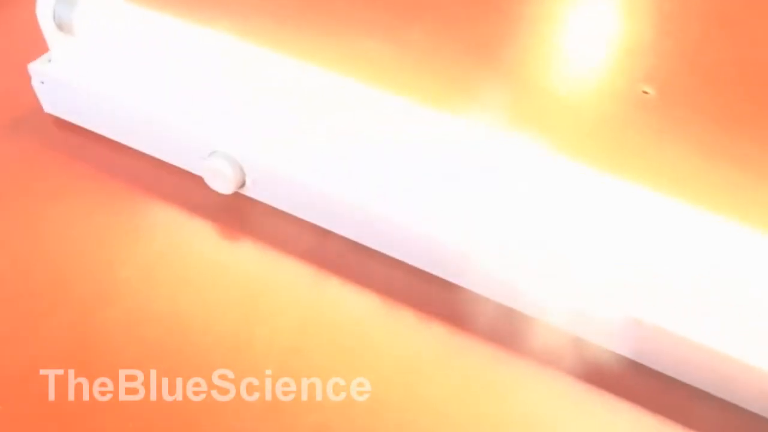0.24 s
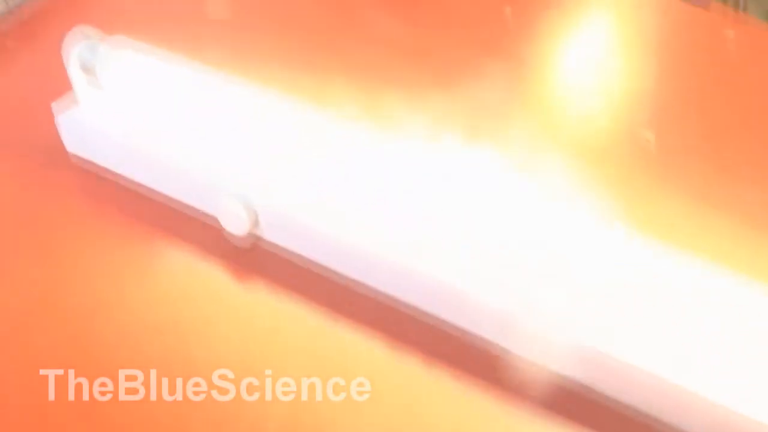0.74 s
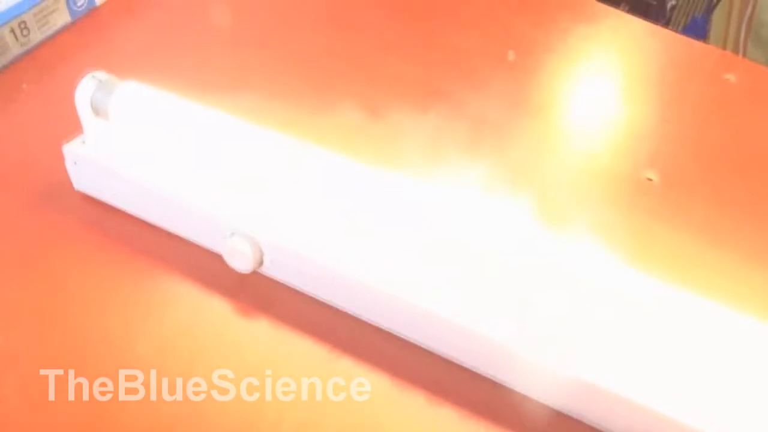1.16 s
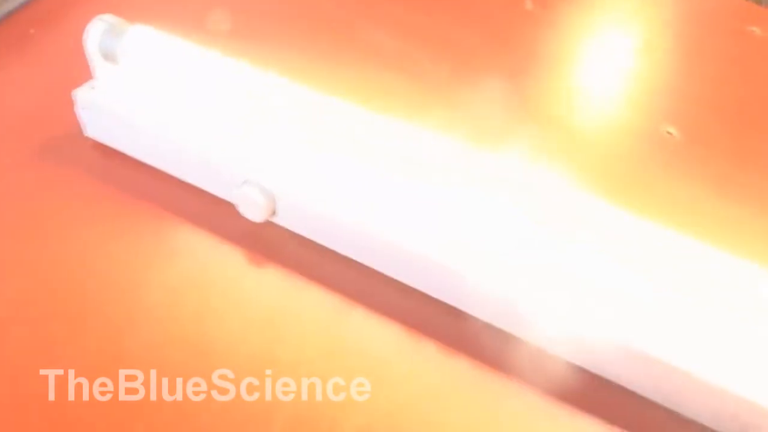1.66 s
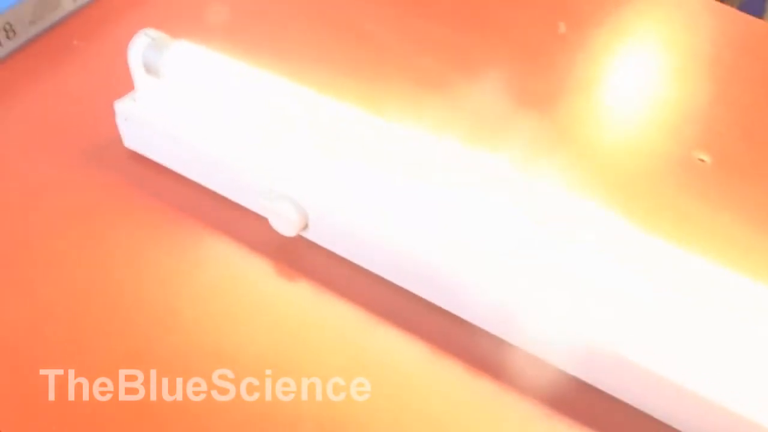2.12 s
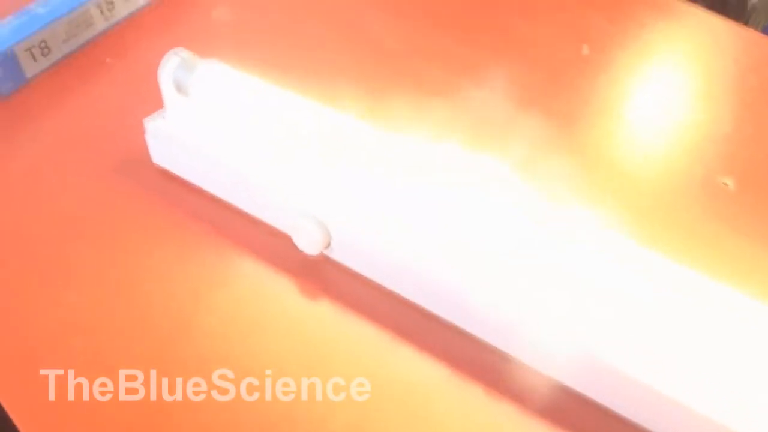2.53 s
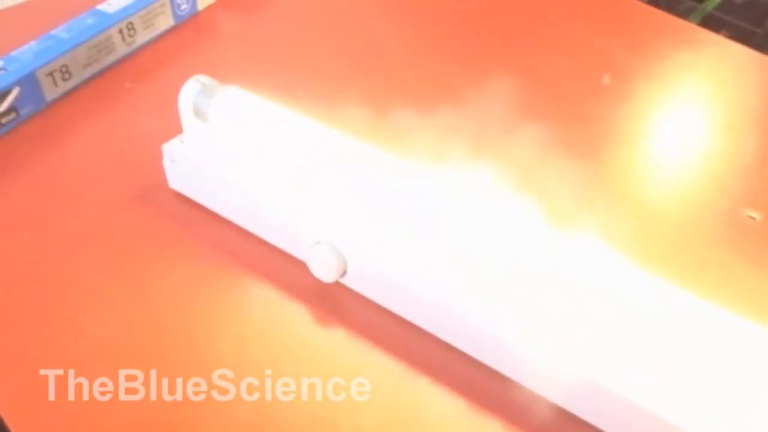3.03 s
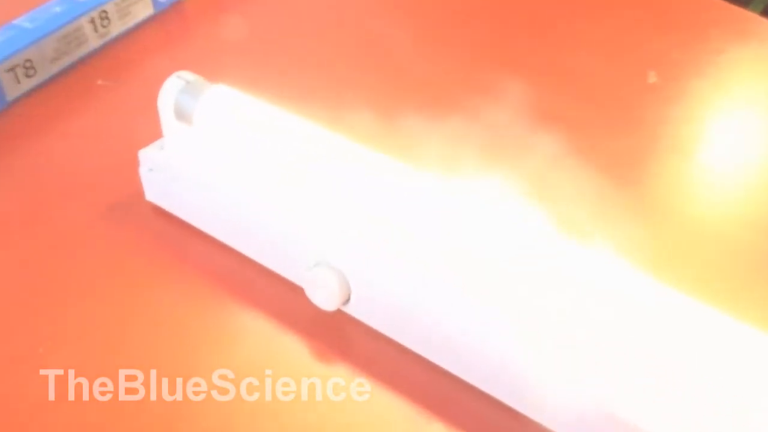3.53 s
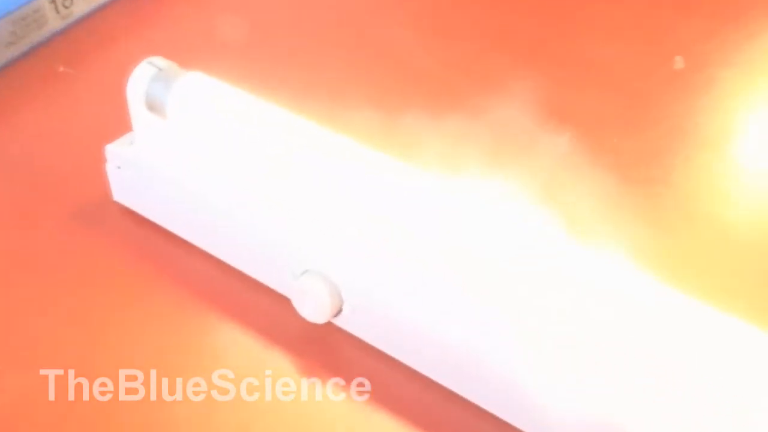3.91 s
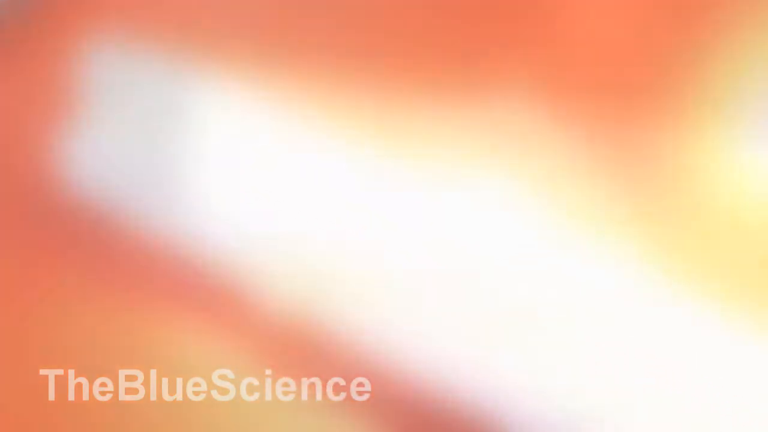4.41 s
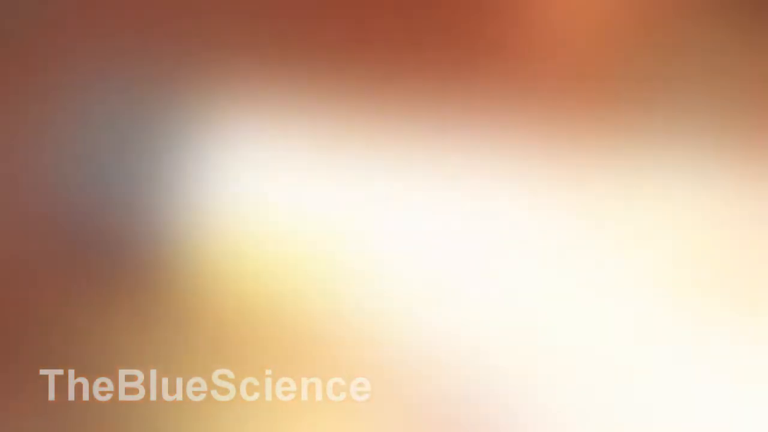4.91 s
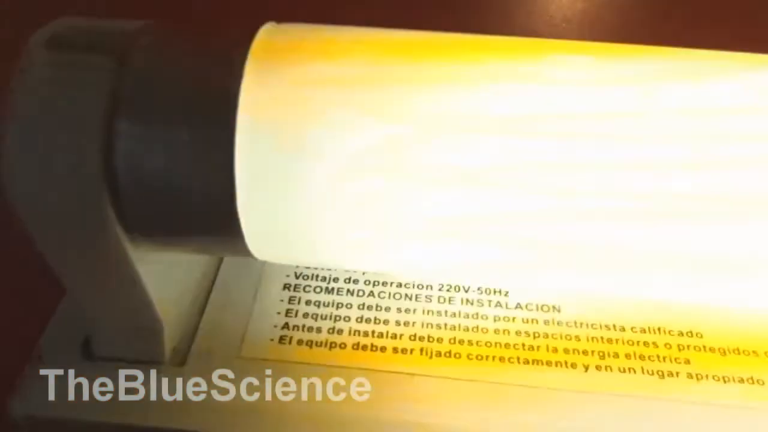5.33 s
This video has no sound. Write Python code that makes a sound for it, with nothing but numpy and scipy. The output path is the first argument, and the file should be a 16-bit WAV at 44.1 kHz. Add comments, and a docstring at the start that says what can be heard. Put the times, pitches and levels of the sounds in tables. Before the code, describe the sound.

Steady electrical hum of a lit fluorescent tube indoors, broken by soft bumps and clicks of a hand on the camera.

```python
"""At a table, a lit fluorescent fixture hums: its ballast core vibrates on multiples of the mains frequency and
drives the steel tray into a buzz. A hand-held camera backs away, so the pattern of the buzz changes at its two
microphone ports. The modes of its shell sound in thuds and ticks, and a rustle runs over it. Behind lie room
noise, the rumble of the hand and a faint whirr, sizzle and squeaks; everything fades at the end."""
import sys
import numpy as np
from scipy import signal
from scipy.fft import rfft, irfft, next_fast_len
from scipy.io import wavfile
from scipy.ndimage import uniform_filter1d

SR = 44100
rng = np.random.default_rng(int(sys.argv[2]) if len(sys.argv) > 2 else 0)


def to_wav(s):
    """Save 16-bit WAV."""
    ch = np.atleast_2d(s).T  # columns
    pcm = np.round(np.clip(ch, -1, 1) * 32767)  # PCM
    wavfile.write(sys.argv[1], SR, pcm.astype(np.int16))


N = 245343
TIME_S = np.arange(N) / SR
MAINS_HZ = 49.985
HARMONIC_HZ = np.arange(240) * MAINS_HZ
LEFT_RIGHT = np.array([[1], [-1]])  # opposite signs at the two ports

# Nearness of the camera, from 0 (far) to 1 (close): time_s, closeness
CLOSENESS = [(0, 0.99), (1.2, 0.9), (2.0, 0.79), (2.6, 0.58), (2.7, 0.2), (3.45, 0.09), (4.3, 0.15),
             (4.6, 0.05)]
# Lines of the core, and of the tray from near and far, set on the nearest harmonic: pitch_hz, level_db
CORE_LINES = [(199.2, -55), (301.5, -56), (349.9, -60.5), (398.4, -57), (452.2, -58), (500.6, -61),
              (549.1, -70.5), (597.5, -53.5), (651.4, -61.5), (699.8, -59), (748.3, -61.5), (802.1, -59.5),
              (850.6, -67), (899.0, -69), (947.5, -68.5), (1001, -63.5), (1050, -71), (1100, -72)]
TRAY_LINES_NEAR = [(1448, -69), (1650, -82), (1701, -75), (1800, -78), (1900, -70), (2100, -75),
                   (2148, -73), (2250, -77), (2299, -69), (2347, -64), (2400, -78), (2450, -76),
                   (2498, -76), (2552, -75), (2697, -76), (2848, -77), (2950, -75), (3747, -81),
                   (3898, -76), (4097, -80), (5647, -83), (5997, -83), (6250, -83), (6648, -83),
                   (7095, -81), (7300, -83), (7547, -78), (7650, -83), (7747, -74), (7849, -80),
                   (8145, -82), (8349, -84), (8446, -85), (8748, -82), (8899, -85), (9948, -87)]
TRAY_LINES_FAR = [(1448, -68), (1900, -75), (2099, -75), (2148, -75), (2347, -72), (2848, -75), (2950, -80),
                  (3047, -80), (3101, -79), (3149, -77), (3596, -84), (4097, -81), (4151, -80), (5050, -86),
                  (5399, -86), (6449, -82), (6597, -83), (6648, -79), (6848, -82), (7547, -85), (7747, -81),
                  (8495, -80), (8748, -83), (8947, -83), (11396, -91)]
# Spectral envelope of the tray's weak harmonics: frequency_hz, level_db
TRAY_WEAK_LINES = [(1120, -80), (1600, -86), (2500, -82.5), (4000, -89.5), (5500, -92.5), (8000, -93.5),
                   (10000, -94.5), (12000, -100)]
# Typical phase between the ports, for the fixture and for the shell: frequency_hz, phase_rad
FIXTURE_PORT_PHASE = [(200, .05), (500, 0.44), (1000, .4), (2500, 0.97), (4000, .3), (8000, 0.84),
                      (12000, .4)]
SHELL_PORT_PHASE = [(100, .1), (300, 0.27), (650, 1.05), (850, 2.87), (1300, 0.59), (2200, 1.35),
                    (4000, 0.55), (8000, 0.85), (12000, .3)]

# Soft impacts on the shell: start_s, peak_db, brightness_db_per_octave, relative_thump_db
THUDS = [(0.427, -33, -1, -16), (0.528, -35, 6, -18), (0.725, -23, 6, -11), (0.751, -32.5, -2, -1),
         (0.791, -30.5, -2, -9), (0.835, -26.5, 0, -12), (0.876, -30.5, 3, -7.5), (0.914, -26, 2, -8),
         (0.954, -23.5, 2, -23.5), (0.972, -33, -5, 0.5), (1.499, -34, -7, -7.5), (1.657, -34, -6, -3),
         (1.858, -27.5, -6, -4.5), (1.893, -35.5, -12, 0), (1.913, -42.5, -8, -1), (2.128, -31.5, 3, -5),
         (2.298, -31.5, 7, -1), (2.437, -26, 7, -26.5), (2.472, -27.5, 13, -16), (2.579, -35.5, -7, -7.5),
         (2.659, -29.5, 4, -8), (2.965, -24, 8.5, -7.5), (3.765, -35.5, 5, -18),
         (4.122, -35.5, -5.5, -16.5), (4.488, -31, -6, -13.5), (4.562, -33.5, -16, -8.5),
         (4.576, -36, -4, -5)]
# Hard impacts: start_s, crack_peak_db, centre_hz, left_minus_right_db, relative_ring_db,
# relative_treble_db
TICKS = [(0.7261, -45.5, 2700, 0, 6, 6), (0.9572, -40, 3770, -1, -9, -19), (1.1422, -41, 3900, 0, -3, -18),
         (1.7137, -47, 4300, 0.0, -12, -1), (2.125, -45, 3300, -5.5, 3, 6),
         (2.4175, -31.5, 3230, -6, 1, -2), (2.441, -38, 2610, -4, -7, -10),
         (2.4719, -10, 3490, -4.5, -12, -18), (2.4996, -41, 2720, -6, -10, -19),
         (2.6458, -43, 2500, 1, 10.5, 12), (2.6752, -41.5, 2680, -2.0, 6.5, -4),
         (3.7638, -38.5, 2920, -1, 0, -2), (3.9673, -42.5, 3170, -3.5, 0, -12),
         (4.1229, -12, 2410, -5, -4.5, -12), (4.1312, -23.5, 1850, 4.5, 0.5, -5.5),
         (4.2747, -43, 3100, -3, -10, -9), (4.297, -36, 3040, -7, -10, -7),
         (4.3463, -31, 3280, -8, -8.5, -16), (4.361, -40.5, 3180, -1.5, 2, -11),
         (4.4746, -36, 2620, 1, 0.5, 3), (4.4961, -46, 2620, -6, -4, 0), (4.5269, -46, 4580, -1, -17, -29)]
# Modes of the shell, two sets for thuds and three for ticks: pitch_hz, relative_db, t60_s
THUMP_MODES = [(146.3, -15, 0.07), (208, -5, 0.041), (278.6, 0.5, 0.069), (330, -6, 0.042)]
THUD_MODES = [(385, -6, 0.091), (521.6, -0.5, 0.068), (660.3, 7.5, 0.049), (860, -4, 0.13),
              (1016, 0.5, 0.039), (1256, -6.5, 0.039), (1447, -9.5, 0.039)]
TICK_MODES = [(570, -8, 0.015), (884, -2, 0.055), (1328, -9, 0.01), (1754, -7, 0.051), (2156, -1, 0.043),
              (2460, -7, 0.038), (2850, 0.5, 0.031), (2900, 1, 0.018), (4540, -9, 0.022)]
TREBLE_MODES = [(4530, -7, 0.022), (5540, -4, 0.01), (6470, -1, 0.0073), (5730, -3, 0.0042),
                (8010, -4, 0.014), (9200, -9.5, 0.0054), (9700, -5.5, 0.0079), (11760, -12, .005),
                (13100, -11, 0.005), (14500, -15.5, 0.005)]
CRACK_MODES = [(2050, -1.5), (2600, -3.5), (3200, -2), (4200, -1)]  # pitch_hz, relative_db only
# Rustle sliding over the shell, and swells driving its cavity: start_s, hold_s, level_db
SLIDES = [(2.126, 0.047, -47.5), (2.21, 0.047, -49.5), (2.413, 0.008, -50), (2.455, 0.014, -47.5),
          (2.648, 0.029, -55.5), (4.124, 0.017, -46.5), (4.304, .01, -52.5), (4.341, 0.0265, -57.5),
          (4.493, 0.036, -54.5)]
CAVITY_DRONES = [(0.74, 0.16, -58.5), (1.876, 0.095, -50)]
# Spectrum of the rustle: frequency_hz, relative_density_db
RUSTLE_SPECTRUM = [(300, -19), (1200, 8), (2500, 1.5), (5000, -7), (9000, -9), (15000, -25.5)]
# Swells of rumble as the grip shifts: peak_s, level_db
GRIP_SHIFTS = [(1.2, -71), (1.9, -63), (2.15, -59.5), (2.62, -67), (5.1, -70)]

# Faint squeaks: start_s, length_s, start_hz, end_hz, level_db
SQUEAKS = [(2.75, 0.087, 895, 890, -56), (2.84, 0.057, 910, 894, -48.5), (3.94, .06, 863, 850, -51),
           (4.02, 0.075, 906, 906, -59)]
# Envelopes of the whirr and the sizzle: time_s, level_db
WHIRR_LEVEL = [(0, -65), (1.5, -74.5), (2.62, -73), (2.69, -56.5), (3.3, -60), (3.45, -61), (4.0, -66),
               (4.25, -80.5), (5.1, -64)]
SIZZLE_LEVEL = [(0, -77), (2.0, -76), (2.7, -71.5), (4.0, -67.5), (4.6, -71), (5.101, -67)]
# Bands of the sizzle: centre_hz, width_hz, relative_db
SIZZLE_BANDS = [(6650, 410, -9.5), (7440, 1100, -1), (8800, 900, -1.5), (9420, 770, -7.5)]
# Room noise near the fixture and far from it: frequency_hz, relative_density_db
ROOM_SPECTRUM_NEAR = [(12, -58.5), (25, -22), (70, -10), (150, -1), (300, 0.5), (600, -2), (1000, -7.5),
                      (1300, -12.5), (2000, -18), (2370, -16), (3500, -22), (5200, -27.5), (7800, -24.5),
                      (10500, -31), (15800, -33.5)]
ROOM_SPECTRUM_FAR = [(12, -56), (25, -17.5), (70, -14.5), (150, -2.5), (300, -1.5), (600, -5), (1000, -7),
                     (1280, -11), (1800, -13), (3000, -19), (3600, -25), (6000, -24.5), (9000, -45.5),
                     (10500, -28.5), (15800, -30)]
# Stereo width of the room noise: frequency_hz, side_minus_mid_db
ROOM_WIDTH = [(20, -21), (120, -17.5), (300, -13.5), (700, -5), (1500, -2.5), (3500, -4.5), (8000, -24.5),
              (12000, -12)]
# Narrow bands of hiss: centre_hz, width_hz, near_db, far_db
HISS_BANDS = [(11550, 160, -80, -89), (4290, 430, -76.5, -72.5), (13250, 500, -91.5, -78)]


def fixture(closeness):
    """Forced vibration: the core jolts in every mains cycle, and hum and buzz share that timing."""
    hz = HARMONIC_HZ
    jitter = np.minimum(0.6 + hz / 1500, np.pi) * rng.standard_normal(len(hz))  # looser in the treble
    sweep = np.pi * 1.2e-5 * hz ** 2  # higher harmonics come first within a cycle
    port_phase = over_hz(FIXTURE_PORT_PHASE, hz) * rng.standard_normal(len(hz))
    phase = jitter + sweep + port_phase / 2 * LEFT_RIGHT
    return ballast_hum(phase) + tray_buzz(phase, closeness)


def ballast_hum(phase, flutter_db=0.61):
    """Harmonics of a periodic force: each core line wavers alone, a little differently at each port."""
    out = 0
    for line in CORE_LINES:
        flutter = wander(25) + 0.46 * wander(25) * LEFT_RIGHT
        out = out + mains_wave(harmonic_power([line]), phase) * undb(flutter_db * flutter)
    return out


def tray_buzz(phase, closeness, spread_db=6.5):
    """Radiation from a driven plate: the tray's pattern of harmonics depends on the listening point."""
    out = 0
    for lines, share in ((TRAY_LINES_NEAR, closeness), (TRAY_LINES_FAR, 1 - closeness)):
        scatter_db = spread_db * rng.uniform(-1, 1, len(HARMONIC_HZ))
        weak_db = over_hz(TRAY_WEAK_LINES, HARMONIC_HZ) + scatter_db
        weak = undb(2 * weak_db) * (HARMONIC_HZ > TRAY_WEAK_LINES[0][0])
        strong = harmonic_power(lines)
        power = np.where(strong > 0, strong, weak)
        out = out + share * undb(0.27 * wander(7)) * mains_wave(power, phase)
    return out


def harmonic_power(lines):
    """A periodic signal has a line spectrum: each line's power falls on the nearest mains harmonic."""
    power = np.zeros(len(HARMONIC_HZ))
    for hz, db in lines:
        power[round(hz / MAINS_HZ)] = undb(2 * db)
    return power


def mains_wave(power, phase, max_lead_rad=0.46, size=2 ** 14):
    """Fourier synthesis: harmonics sum to one repeating cycle, which reaches the left port first."""
    lead = max_lead_rad * np.tanh(HARMONIC_HZ / 500) / 2 * LEFT_RIGHT
    cycle = irfft(np.sqrt(power / 2) * np.exp(1j * (phase + lead)), size) * size
    turns = MAINS_HZ * TIME_S
    return cycle[:, (turns % 1 * size).astype(int)]


def shell_thuds(pan_db=-0.72):
    """Soft impact: a slow contact excites the low modes of the shell."""
    out = np.zeros((2, N))
    for start_s, db, tilt_db, thump_db in THUDS:
        thump = shell_ring(THUMP_MODES, rise_s=0.006, roughness=0.18)
        modes = [(hz, level + tilt_db * np.log2(hz / 660), t60) for hz, level, t60 in THUD_MODES]
        knock = shell_ring(modes, rise_s=0.0035, roughness=0.25, scatter_rad=1.2)
        add(out, thump, start_s, db + thump_db, pan_db)
        add(out, knock, start_s, db, pan_db)
    return out


def shell_ticks(crack_t60_s=0.0074, focus_db=30.5):
    """Hard impact: a brief contact cracks and excites the high modes of the shell."""
    out = np.zeros((2, N))
    for start_s, db, centre_hz, pan_db, ring_db, treble_db in TICKS:
        modes = [(hz, level - focus_db * np.log2(hz / centre_hz) ** 2, crack_t60_s)
                 for hz, level in CRACK_MODES]
        crack = shell_ring(modes, rise_s=0.00143, roughness=0.21, scatter_rad=0.1)
        ring = shell_ring(TICK_MODES, rise_s=0.002047, roughness=1.0)
        treble = shell_ring(TREBLE_MODES, rise_s=0.0017, roughness=0.44)
        add(out, crack + undb(ring_db) * ring + undb(treble_db) * treble, start_s, db, pan_db)
    return out


def shell_ring(modes, rise_s, roughness, scatter_rad=3.32):
    """Damped free vibration: rough, slightly detuned modes decay exponentially; their sum peaks at 1."""
    t = np.arange(int(0.15 * SR)) / SR
    out = 0
    for hz, db, t60_s in modes:
        onset, width, detune = rng.standard_normal(3)
        port_phase = (1 + 0.45 * width) * over_hz(SHELL_PORT_PHASE, hz)
        phase = scatter_rad * onset + port_phase / 2 * LEFT_RIGHT
        tone = np.sin(2 * np.pi * hz * (1 + 0.021 * detune) * (t - rise_s) + phase)
        wobble = 1 + roughness * wander(hz, len(t))
        out = out + undb(db) * wobble * tone * 1000 ** (-t / t60_s)
    out = out * np.minimum(t / rise_s, 1) ** 3  # contact builds up before it lets go
    return out / np.abs(out).max()


def shell_rustle():
    """Sliding friction: rubbing on the shell sheds dense noise grains of random strength."""
    grain_db = 2 * rng.exponential(size=N // 40 + 1).repeat(40)[:N]
    mid, side = rng.standard_normal((2, N)) * undb(grain_db)
    grains = mid + 0.5 * side * LEFT_RIGHT
    rustle = coloured(grains / grains.std(), lambda hz: undb(over_hz(RUSTLE_SPECTRUM, hz)))
    return rustle * sum(swell(*slide) for slide in SLIDES)


def cavity_drone():
    """Cavity resonance: the hollow of the shell sounds while it keeps being driven."""
    drive = sum(swell(*drone) for drone in CAVITY_DRONES)
    return noise_band(centre_hz=246, width_hz=40) * undb(2.7 * wander(30)) * drive


def hand_rumble(rest_db=-75.5, db_per_s=75.5):
    """Structure-borne noise: the hand rumbles on the shell, more so as the grip shifts."""
    shifts = sum(swell(peak_s, 0, db, db_per_s, db_per_s) for peak_s, db in GRIP_SHIFTS)
    return noise_band(centre_hz=71, width_hz=86) * (undb(rest_db) + shifts) * undb(1.8 * wander(9))


def squeaks():
    """Amplitude-shaped pure tones: each faint squeak holds its pitch or glides slightly down."""
    out = np.zeros((2, N))
    for start_s, length_s, start_hz, end_hz, db in SQUEAKS:
        hz = np.linspace(start_hz, end_hz, int(length_s * SR))
        tone = np.sin(2 * np.pi * np.cumsum(hz) / SR)
        add(out, np.sqrt(2 * np.hanning(len(hz))) * tone, start_s, db)
    return out


def whirr():
    """Narrow-band noise has a vague pitch: a faint whirr comes and goes."""
    return noise_band(centre_hz=1431, width_hz=120) * undb(over_time(WHIRR_LEVEL) + wander(23))


def sizzle():
    """Random amplitude modulation: bands of treble noise flicker independently."""
    out = 0
    for centre_hz, width_hz, db in SIZZLE_BANDS:
        noise = noise_band(centre_hz, width_hz) + 0.23 * noise_band(centre_hz, width_hz) * LEFT_RIGHT
        out = out + noise * undb(over_time(SIZZLE_LEVEL) + db + 1.4 * wander(22))
    return out


def room_noise(closeness, level_db=-52):
    """Partial coherence: room and circuit noise is alike at both ports in the bass; hiss bands stand out."""
    mid, side = rng.standard_normal((2, N))
    side_gain = undb(over_hz(ROOM_WIDTH, np.arange(N // 2 + 1) * SR / N))
    noise = mid + irfft(rfft(side) * side_gain, N) * LEFT_RIGHT
    near = coloured(noise, lambda hz: undb(over_hz(ROOM_SPECTRUM_NEAR, hz))) * undb(0.3)
    far = coloured(noise, lambda hz: undb(over_hz(ROOM_SPECTRUM_FAR, hz))) * undb(-0.3)
    out = (closeness * near + (1 - closeness) * far) * undb(level_db + 0.5 * wander(6.1))
    for centre_hz, width_hz, near_db, far_db in HISS_BANDS:
        hiss_db = far_db + (near_db - far_db) * closeness + 2.1 * wander(18)
        out += noise_band(centre_hz, width_hz) * undb(hiss_db)
    return out


def noise_band(centre_hz, width_hz):
    """Resonance selects one steep band from white noise."""
    return coloured(rng.standard_normal(N), lambda hz: 1 / (1 + (2 * (hz - centre_hz) / width_hz) ** 2))


def coloured(noise, gain_at_hz):
    """Linear filtering shapes the spectrum, scaled so that white noise keeps its power."""
    size = next_fast_len(N)
    gain = gain_at_hz(np.arange(size // 2 + 1) * SR / size)
    return irfft(rfft(noise, size) * gain, size)[..., :N] / np.sqrt(np.mean(gain ** 2))


def wander(rate_hz, size=N):
    """Low-pass fluctuation: random steps at rate_hz, smoothed twice."""
    hold = int(SR / rate_hz)
    steps = np.repeat(rng.standard_normal(size // hold + 1), hold)
    return 2.05 * uniform_filter1d(uniform_filter1d(steps, hold), hold)[:size]


def swell(start_s, hold_s, db, rise_db_per_s=1202.5, fall_db_per_s=330.5):
    """Exponential growth and decay: the gain reaches db at start_s, holds and sinks."""
    t = TIME_S - start_s
    return undb(db + np.minimum(t, 0) * rise_db_per_s - np.maximum(t - hold_s, 0) * fall_db_per_s)


def add(track, sound, start_s, db, pan_db=0):
    """Superposition: a sound joins the track, pan_db louder on the left than on the right."""
    start = int(start_s * SR)
    track[:, start:start + sound.shape[-1]] += sound * undb(db + pan_db / 2 * LEFT_RIGHT)


def over_hz(table, hz):
    """Interpolation on a logarithmic frequency axis."""
    points_hz, values = np.transpose(table)
    return np.interp(np.log(np.maximum(hz, 1)), np.log(points_hz), values)


def over_time(table):
    """Linear interpolation in time."""
    return np.interp(TIME_S, *np.transpose(table))


def undb(db):
    """Amplitude ratio of a level in decibels."""
    return 10 ** (np.asarray(db) / 20)


def scene():
    """Sound pressures add; fixture and room grow slightly quieter as the camera backs away."""
    closeness = over_time(CLOSENESS)
    hum = fixture(closeness) * undb(np.interp(closeness, (0, 1), (-0.98, 1.9)))
    handling = shell_thuds() + shell_ticks() + shell_rustle() + cavity_drone() + hand_rumble()
    room = room_noise(closeness) * undb(-2 * (1 - closeness))
    return hum + handling + squeaks() + whirr() + sizzle() + room


def record(dry, bottom_hz=25, top_hz=15750, fade_s=(4.66, 5.374)):
    """Band limiting: a bass cut and a steep treble cut, with a fade to silence between them."""
    fade = 1 - np.interp(TIME_S, fade_s, (0, 1)) ** 1.29
    high_pass = signal.butter(2, bottom_hz, "high", fs=SR, output="sos")
    low_pass = signal.ellip(12, 0.2, 60, top_hz, fs=SR, output="sos")
    return signal.sosfilt(low_pass, signal.sosfilt(high_pass, dry) * fade)


dry = scene()
out = record(dry)
to_wav(out)
```